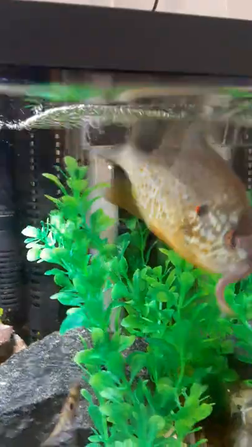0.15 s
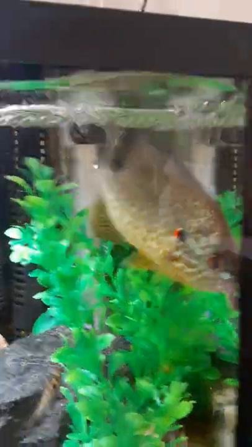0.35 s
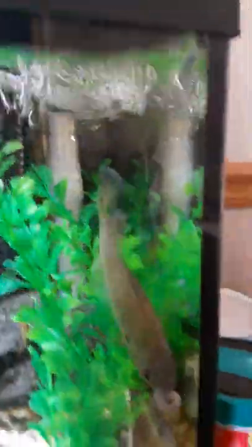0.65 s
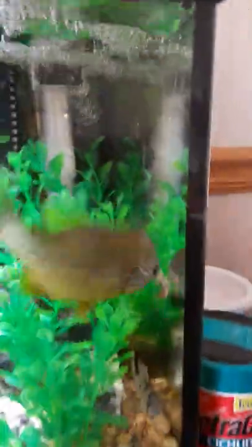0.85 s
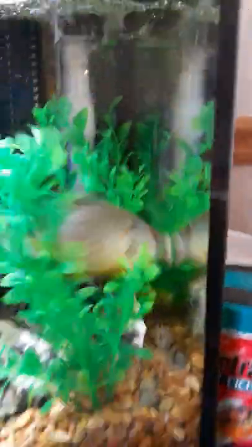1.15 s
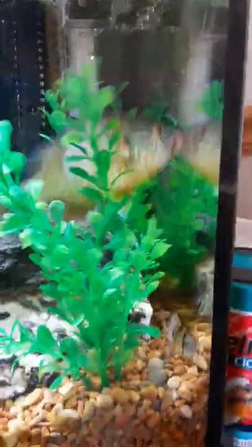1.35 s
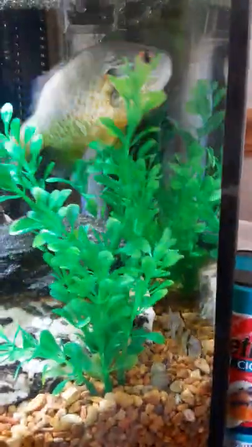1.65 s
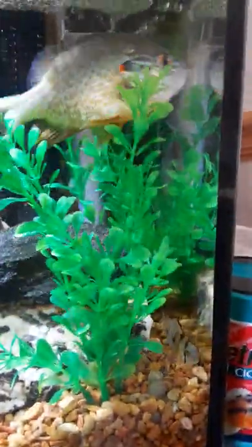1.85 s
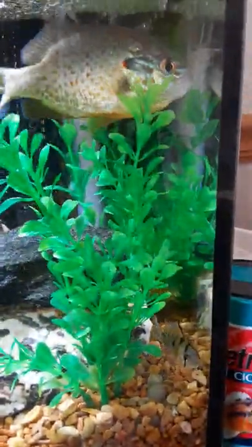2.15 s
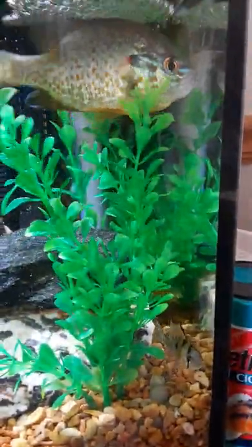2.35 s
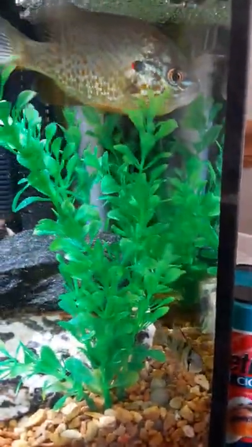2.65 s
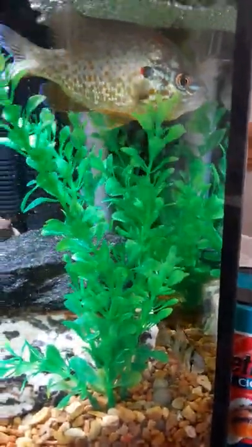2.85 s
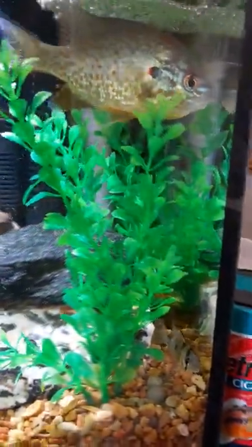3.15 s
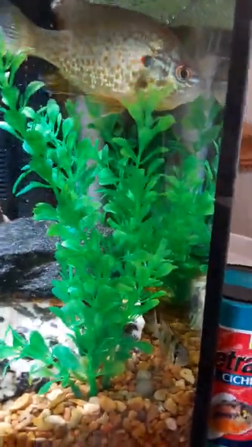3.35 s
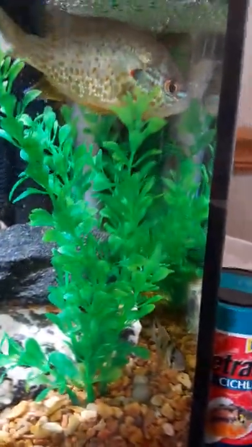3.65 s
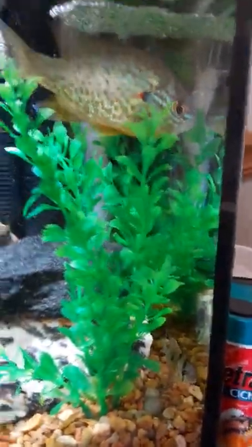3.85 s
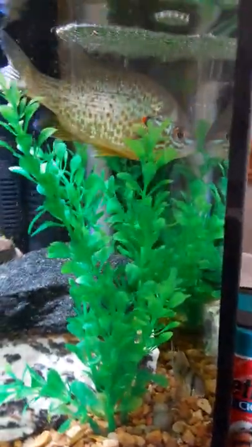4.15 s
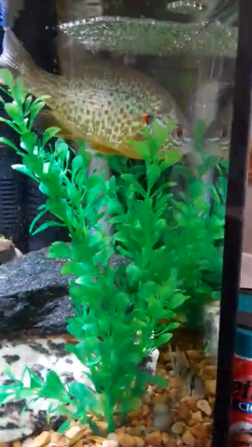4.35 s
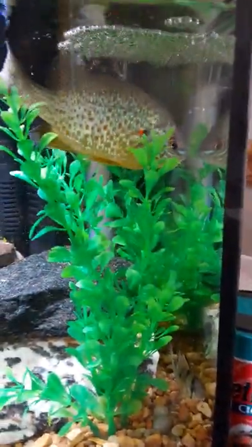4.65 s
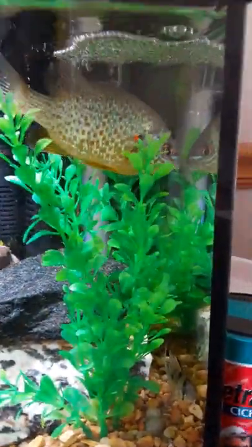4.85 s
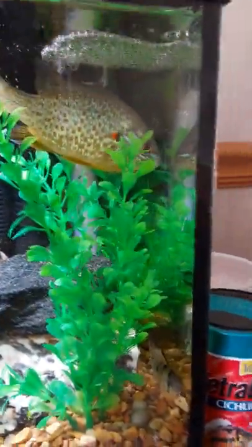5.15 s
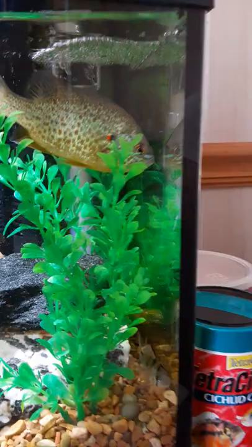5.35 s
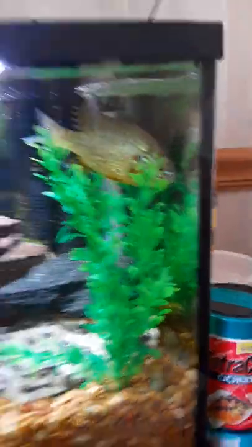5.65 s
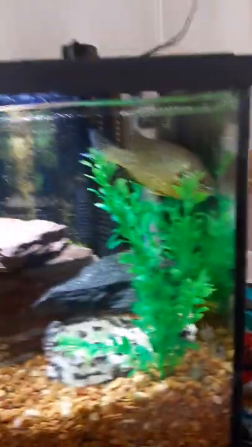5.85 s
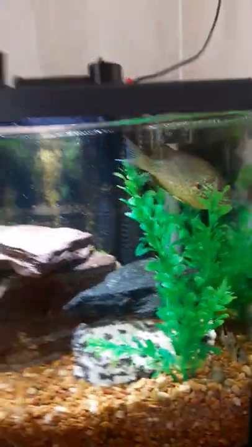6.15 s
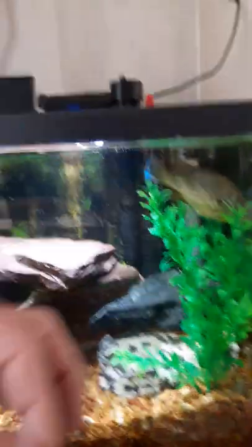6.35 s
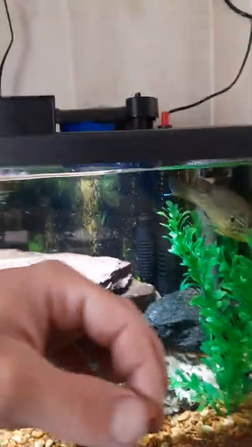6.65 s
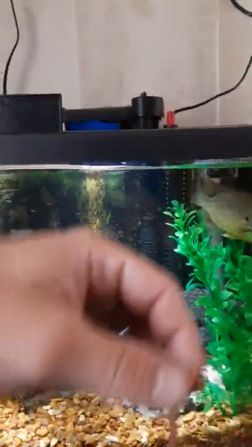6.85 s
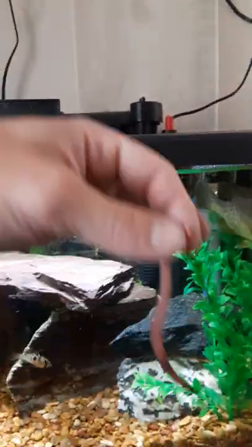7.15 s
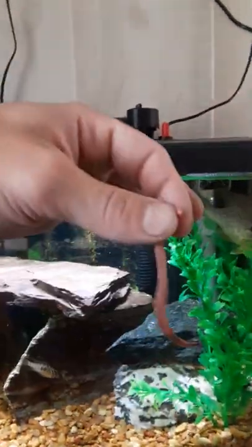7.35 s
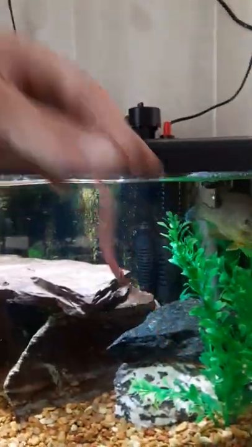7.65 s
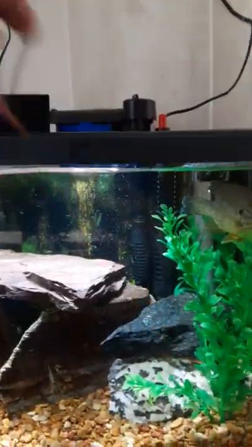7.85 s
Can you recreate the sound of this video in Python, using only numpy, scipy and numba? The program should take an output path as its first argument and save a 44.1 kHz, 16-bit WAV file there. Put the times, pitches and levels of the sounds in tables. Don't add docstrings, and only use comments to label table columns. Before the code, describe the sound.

A small aquarium pump hums steadily while wet bubbles glug, trickle and pop close by, with faint finger ticks and knocks in a quiet room.

```python
import sys
import numpy as np
from scipy import signal
from scipy.fft import rfft, irfft
from scipy.io import wavfile
from scipy.ndimage import uniform_filter1d
from numba import njit

SR = 44100
rng = np.random.default_rng(int(sys.argv[2]) if len(sys.argv) > 2 else 0)


def dump_mix(stems):
    frames = np.atleast_2d(stems).T
    limited = np.clip(frames, -1, 1)
    pcm = np.round(limited * 32767).astype(np.int16)
    wavfile.write(sys.argv[1], SR, pcm)


def gain_from_decibels(decibels):
    exponent = np.asarray(decibels, float) / 20
    return 10 ** exponent


N = 352800
T = np.arange(N) / SR
HZ = np.fft.rfftfreq(N, 1 / SR)

# [f/Hz, density level/dB]
AIR = [(15, -53), (25, -16), (69, -14), (122, -8), (221, -6.5), (289, -30), (598, -18), (782, -17),
       (1340, -21.5), (1900, -19.5), (3440, -27.5), (7500, -25), (9050, -34.5), (12200, -28.5),
       (15500, -30.5)]
# [f/Hz, likeness -1 to 1]
ALIKE = [(60, 0.75), (250, 1), (500, 0.37), (900, 0.0094), (2000, -0.32), (16000, 0.11)]
# [f/Hz, level/dB]
PORTS = [(100, 0), (400, 5.5), (1300, 1.5), (4000, 4.5), (7000, -1.5), (9300, 10.5), (12000, 1),
         (15000, -2)]
HUM_DB = [-58.5, -47, -62.5, -70, -61, -67.5, -67.5, -68.5, -70, -82, -74, -84, -66.5, -76]
# [f/Hz, rms level/dB]
FAN = (274.4, -61)
# [t/s, hum change level/dB, upper partials level/dB]
STANCE = [
    (0, -1, 5),
    (2, 0.5, 1),
    (4, 0, 3),
    (5.6, 0, 0),
    (6.2, -0.5, -0.5),
    (6.7, 0, -5.5),
    (8, 1.5, -11),
]
TURN_S = 6.13, 6.75
# [t/s, peak level near 190 Hz/dB, deep part level/dB]
THUMPS = [(0.518, -60, -60), (0.757, -41, -49), (0.866, -40.5, -66), (1.174, -36, -59), (1.2, -44, -57),
          (1.22, -47, -49), (1.247, -37, -55), (1.296, -51, -66), (1.337, -48, -60), (2.899, -43, -59),
          (2.969, -53, -65), (6.137, -43, -71)]
# [t/s, hiss level/dB]
RUB = [(0, -67.5), (.62, -64.5), (1.31, -66), (2.81, -66), (3.3, -61.5), (4.19, -59.5), (4.63, -64),
       (4.94, -60.5), (5.39, -63), (5.59, -57.5), (5.72, -66), (5.9, -67), (6.33, -58), (6.68, -68),
       (7.15, -61.5), (7.55, -73), (7.71, -61), (8, -56.5)]
# [t/s, length/s, level/dB]
RUSTLE = (5.42, .27, -64.5)
# [t/s, peak level/dB, duller part level/dB, left minus right level/dB]
TICKS = [(0.6574, -48, -11, -7.5), (1.5736, -41, -26, -1), (2.0368, -46, -19, -6.0),
         (2.8564, -50, -22, -8.0), (3.579, -44, -8.5, -20), (3.6494, -47, -13, -11),
         (3.9539, -45, -15, -12.0), (4.5286, -48, -13, -3), (5.3994, -53, -9, -2), (5.637, -33, -15, -19),
         (5.656, -16.5, -25.5, -39), (5.7488, -41, -20, -16), (5.7573, -39, -19, -17), (7.943, -43, -13, 1)]
# [t/s, steady glugging level/dB]
AIRFLOW = [(0, -43.5), (.09, -56), (.6, -51.5), (1.3, -54), (1.9, -54), (2.15, -56), (2.45, -52),
           (2.7, -55), (3.1, -52), (3.61, -50), (4.2, -54.5), (4.9, -53), (5.25, -53.5), (5.97, -54),
           (6.62, -52.5), (7.2, -50.5), (7.6, -52.5), (8, -50)]
# [t/s, length/s, level/dB]
SURGES = [(0.023, 0.068, -47.5), (0.39, 0.13, -47.5), (0.723, 0.055, -46.5), (0.89, 0.076, -51.5),
          (1.47, 0.04, -49.5), (1.64, 0.051, -52), (1.787, 0.053, -46.5), (2.327, 0.032, -51),
          (2.48, 0.039, -46), (2.866, 0.039, -54), (2.958, 0.034, -48.5), (3.3, 0.059, -47.5),
          (3.43, 0.031, -49), (3.647, 0.048, -48), (4.035, 0.052, -53), (4.51, 0.039, -49),
          (6.574, 0.045, -46.5), (6.71, 0.026, -47.5), (7.21, 0.038, -49), (7.385, 0.05, -48),
          (7.463, 0.027, -49), (7.546, 0.1, -47.5), (7.748, 0.023, -46)]
# [t/s, peak level/dB, f/Hz, ring time/s]
GLUGS = [(0.034, -41.5, 315, 0.043), (0.385, -40, 423, 0.069), (0.519, -33.5, 415, 0.059),
         (0.724, -22, 470, 0.029), (0.735, -31.5, 490, 0.057), (0.749, -48, 312, 0.037),
         (0.804, -39, 462, 0.081), (1.653, -39, 450, 0.083), (1.782, -41, 300, 0.05),
         (2.483, -43, 315, 0.06), (3.314, -37.5, 427, 0.068), (4.036, -36, 310, 0.057),
         (5.619, -33, 350, 0.037), (5.733, -40, 360, 0.059), (6.723, -40, 292, 0.026)]
# [f/Hz, width/Hz, level/dB]
SIDE_CHAMBER = [(282.4, 15, -2.5), (310, 26.5, -0.5), (348.8, 31, -1.5), (426.3, 31, 5), (458.4, 62, -4.5)]
# [f/Hz, width/Hz, level/dB]
FRONT_CHAMBER = [(275, 29, -2), (315, 62, -0.5), (357.4, 15.4, 5), (436, 55, -6), (477.6, 10, 3)]
# [f/Hz, width/Hz, level/dB]
SIDE_MODES = [(1003, 67, 0.5), (1202, 40, 9), (1500, 41, 0), (1610, 13, 8), (1880, 84, -5.5),
              (2050, 43, 7.5), (3070, 67, 3), (3730, 88, 10)]
# [f/Hz, width/Hz, level/dB]
FRONT_MODES = [(772, 15, 12.5), (1155, 32, 3), (1510, 50, 10.5), (1670, 37, 6), (1940, 47, 4.5),
               (2210, 120, 5.5), (3130, 80, 3), (3250, 86, -15), (3800, 150, 0)]
# [t/s, length/s, level/dB, smallest bubbles level/dB]
CLUSTERS = [(0.02, 0.027, -49.5, -56.5), (0.466, 0.04, -62, -54), (0.606, 0.034, -56, -56),
            (0.899, 0.052, -55, -57), (1.057, 0.11, -59, -71), (1.385, 0.098, -65, -63),
            (1.654, 0.026, -57.5, -62), (1.849, 0.045, -50.5, -69), (2.349, 0.014, -58, -64),
            (2.449, 0.18, -58.5, -66), (2.7711, 0.028, -60, -70), (2.983, 0.011, -51, -63),
            (3.02, 0.059, -60, -59), (3.435, 0.026, -58.5, -76), (3.666, 0.049, -54, -76),
            (3.791, 0.054, -56.5, -55.5), (3.94, .12, -57.5, -64), (4.1, 0.12, -60, -65),
            (4.512, 0.029, -51.5, -59), (4.6, 0.082, -58.5, -76), (4.8683, 0.046, -55.5, -65),
            (5.017, 0.2, -57, -61.5), (5.4999, 0.037, -48.5, -56.5), (5.7, 0.023, -62, -55.5),
            (5.843, 0.057, -55.5, -57), (5.9868, 0.1, -57, -63), (6.6125, 0.052, -53, -56),
            (7.084, 0.18, -59.5, -63), (7.463, 0.2, -60, -66), (7.807, 0.21, -63, -70)]
# [t/s, peak level/dB, f/Hz]
POPS = [(0.187, -42, 1940), (0.521, -40, 2000), (0.6362, -38, 1990), (0.8026, -43, 1980),
        (1.0026, -45.5, 2070), (1.069, -46, 2050), (1.5663, -44.5, 1610), (2.0837, -45, 1950),
        (2.2523, -46, 1620), (3.0357, -37, 2090), (3.378, -42, 1600), (3.533, -44.5, 1670),
        (3.671, -45, 1630), (4.137, -45, 2060), (4.2023, -45, 2070), (5.1342, -44, 1930),
        (5.1523, -39, 2000), (5.8854, -42, 2400), (5.9858, -45, 1760), (6.2524, -41.5, 1940),
        (6.884, -42, 1940), (6.9518, -41.5, 1970), (7.1177, -42.5, 2260), (7.255, -40, 1510),
        (7.467, -39.5, 1520), (7.4994, -43, 1880), (7.5698, -45, 1960), (7.608, -43, 1510),
        (7.837, -44.5, 1500), (7.885, -45, 1930)]
# [t/s, peak level/dB, f/Hz]
MORE_POPS = [(0.17, -45, 1980), (0.4534, -45.5, 2060), (0.9207, -47, 1610), (0.9524, -50, 2080),
             (1.0879, -47, 2080), (1.1548, -46.5, 1880), (1.1694, -52, 2190), (1.404, -47, 2020),
             (1.4376, -52, 1870), (1.4661, -49, 2060), (1.6664, -44, 1660), (1.7828, -45.5, 2050),
             (1.8684, -46, 1620), (1.8881, -49, 1970), (1.9044, -51, 1610), (2.0363, -51, 1870),
             (2.1415, -53, 1610), (2.3516, -46, 2070), (2.7994, -54, 1980), (2.8988, -46.5, 1620),
             (3.0494, -45, 2000), (3.0694, -44, 1610), (3.1857, -50, 1610), (3.2994, -50, 2040),
             (3.5667, -47, 1840), (3.8003, -44, 1960), (4.5294, -46, 2070), (4.6364, -50, 2050),
             (4.8844, -48, 2070), (5.12, -50, 1910), (5.854, -41, 1880), (6.0194, -50, 1920),
             (6.5839, -48, 1500), (6.6323, -43, 1950), (6.659, -50, 1970), (6.6877, -50, 1490),
             (6.7151, -46, 1850), (6.8009, -48, 1960), (6.8344, -53, 1920), (6.8676, -45, 1960),
             (7.1671, -46, 1510), (7.2225, -48, 1500), (7.3193, -52, 1900), (7.437, -45.5, 1960),
             (7.5486, -48, 1980), (7.7707, -49, 1700)]
# [t/s, peak level/dB, f/Hz]
PINGS = [(0.038, -35.5, 3170), (0.4858, -43, 4230), (0.6208, -41, 3850), (0.636, -39.5, 4570),
         (0.8869, -44, 3520), (0.9517, -51, 2930), (1.3877, -43, 3550), (3.0345, -50, 3270),
         (3.8385, -36, 3730), (4.14, -39, 3340), (4.517, -38.5, 3730), (5.204, -40.5, 3600),
         (5.5024, -37.5, 3570), (5.656, -55, 4960), (5.885, -35.5, 3110), (6.551, -47, 3770),
         (6.588, -39, 3320), (6.635, -35.5, 3760), (6.652, -37, 3800), (6.7182, -43.5, 3800),
         (6.8169, -48, 3830), (6.867, -45, 3720), (6.8857, -41.5, 3800), (7.119, -49, 3740),
         (7.2185, -44, 4030), (7.2538, -39.5, 3650), (7.532, -45, 3900), (7.57, -37, 3480),
         (7.9229, -47, 5100), (7.944, -47, 2950),
         (0.5681, -51, 3980), (0.9094, -44, 3130), (1.4715, -48, 3150), (1.567, -46, 2980),
               (1.6696, -46, 3630), (1.8487, -51, 3040), (1.8881, -47, 2870), (1.9194, -49, 5080),
               (2.2358, -53, 4030), (2.3381, -49, 2860), (2.354, -47, 2900), (2.5167, -52, 2670),
               (3.0764, -46, 3730), (3.8077, -49, 2900), (3.9534, -48, 2640), (4.0188, -48, 2600),
               (4.0821, -48, 2880), (4.8693, -48, 3760), (4.8894, -47, 3760), (5.0177, -50, 4050),
               (5.1512, -50, 2680), (5.7004, -49, 2880), (5.7129, -47, 3830), (5.9044, -41, 3880),
               (6.0691, -43, 3720), (6.2512, -47, 3760), (6.8, -50, 3720), (7.1003, -54, 3780),
               (7.1676, -54, 3740), (7.3851, -54, 3770), (7.4689, -49, 3040), (7.4999, -52, 3840),
               (7.7677, -49, 3710), (7.8835, -49, 2980), (7.965, -46.5, 3940)]
# [t/s, peak level/dB]
SPLATS = [
    (3.034, -47),
    (3.318, -50),
    (3.379, -45),
    (5.72, -50),
    (7.9404, -34.5),
]

AIR_DB = -55
MAINS_HZ = 60.02
LOW_HZ, TOP_HZ = 48, 15790
SHARP_DB, SHARP_TOP_HZ = -38, 17300
SCUFF_S, SCUFF_DB, SCUFF_TOP_DB = 0.013, -18, -61
DULL_DB, DULL_SLOPE = -66, 2.2
RUSTLE_HZ, RUSTLE_WIDTH_HZ = 7050, 750
SURGE_RISE_DB_PER_S, SURGE_FALL_DB_PER_S = 400, 193
RISE_DB_PER_S, FALL_DB_PER_S = 1500, 300
STROKE_DB, STROKE_S = 0.5, 0.0034
TRICKLE_DB, MIST_DB = -13.5, -16.5
SPRAY_S, SPRAY_DB, SPRAY_SMALL_DB = 0.009, -14, -23.5
LATE_SHARE = 0.56
LEAD_DB, LEAD_HZ = 12.5, 1980
CRACK_DB = -9.5
CRACKLE_DB = -12
TUBE_LAG = 21


def on_log(table, hz=HZ):
    f, v = np.transpose(table)
    return np.interp(np.log(hz + 1), np.log(f), v)


def columns(table, s=T):
    t, *rest = np.transpose(table)
    return [np.interp(s, t, c) for c in rest]


def unit(x):
    return x / np.sqrt(np.mean(x ** 2))


def filt(x, gain):
    return irfft(rfft(x) * gain, N)


def band(hz, width):
    return 1 / (1 + 1j * (HZ ** 2 - hz ** 2) / (HZ * width + 1e-9))


def body(modes):
    return sum((-1) ** k * gain_from_decibels(db) * band(f, w) for k, (f, w, db) in enumerate(modes))


def walk(rate):
    hold = int(SR / rate)
    steps = np.repeat(rng.standard_normal(N // hold + 1), hold)
    return 1.89 * uniform_filter1d(uniform_filter1d(steps, hold), hold)[:N]


def swells(s, length, db, under_db, rise_db, fall_db):
    t = T[::64, None]
    each_db = db - rise_db * np.maximum(s - t, 0) - fall_db * np.maximum(t - s - length, 0)
    events = np.sqrt(np.sum(gain_from_decibels(2 * each_db), 1))
    return 20 * np.log10(np.hypot(np.interp(T, t[:, 0], events), gain_from_decibels(under_db)))


@njit
def ring(n, start, step, fade, glide, size, onset):
    y = np.zeros(n)
    for k in range(len(start)):
        a, w, ph, i, shut = size[k], step[k], 0., start[k], 1.
        while a > .004 * size[k] and i < n:
            y[i] += a * (1 - shut) * np.sin(ph)
            ph += w
            w *= glide[k]
            a *= fade[k]
            i += 1
            shut *= onset[k]
    return y


def bubbles(s, hz, t60, db, rise=0.39, swell=0.26):
    n = np.maximum(t60 * SR + 0 * s, 8)
    step = hz / SR + 0 * s
    start = (s * SR).astype(np.int64)
    fade, glide = 1000 ** (-1 / n), (1 + rise) ** (1 / n)
    return ring(N, start, 2 * np.pi * step, fade, glide, gain_from_decibels(db), np.exp(-step / swell))


def air():
    alike = np.clip(on_log(ALIKE), -.99, .99)
    noise = rfft(rng.standard_normal((2, N)))
    mid, side = noise * gain_from_decibels(on_log(AIR)) * np.sqrt([1 + alike, 1 - alike])
    pair = np.array([mid + side, mid - side]) * gain_from_decibels(np.outer([.5, -.5], on_log(PORTS)))
    out, half_octave = 0, 2 * np.log2(HZ / 30 + 1e-9)
    for k in range(0, 20, 2):
        share = np.cos(np.pi / 4 * np.clip(half_octave - k, -2, 2)) ** 2
        out = out + irfft(pair * share, N) * gain_from_decibels(1.2 * walk(8) + .2 * walk(1.2))
    return unit(out) * gain_from_decibels(AIR_DB)


def pump():
    all_db, upper_db = columns(STANCE)
    left_right = np.array([[.5], [-.5]])
    partials = [(MAINS_HZ * (k + 1), db) for k, db in enumerate(HUM_DB)] + [FAN]
    out = 0
    for hz, db in partials:
        phase = 2 * np.pi * (hz * T + rng.random()) + left_right * (0.45 + 0.8 * (hz / 800) ** 3)
        tilt = on_log(PORTS, hz) * left_right
        waver = hz / 800 * (upper_db + 2.33 * walk(14)) + 0.39 * walk(9)
        out = out + gain_from_decibels(db + tilt + all_db + waver) * np.sqrt(2) * np.sin(phase)
    return out


def ticks(rows):
    s, db, dull_db, pan_db = np.transpose(rows)
    x = bubbles(s + 0.0014, 13800, 0.0006, db + 22.5, rise=0, swell=1.4)
    x += bubbles(s + 0.00085, 7000, 0.00074, db + dull_db + 26.5, rise=0, swell=0.16)
    return x * np.array([gain_from_decibels(np.interp(T, s + .002, pan_db)), np.ones(N)])


def hand():
    s, db, deep_db = np.transpose(THUMPS)
    knocks = bubbles(s, 207, 0.084, db, rise=-0.25, swell=0.24)
    knocks += bubbles(s, 138, 0.12, db - 0.5, rise=-0.092)
    knocks += bubbles(s, 87.7, 0.27, deep_db, rise=0, swell=0.22)

    rub_db = columns(RUB)[0]
    dull_db = DULL_DB + DULL_SLOPE * (rub_db + 61.5)
    s, db = np.transpose([row[:2] for row in TICKS if row[1] < SHARP_DB])
    scuff_db = np.minimum(db + SCUFF_DB, SCUFF_TOP_DB)
    bright_db = swells(s, SCUFF_S, scuff_db, rub_db, 900, 400)
    rustle_db = swells(*RUSTLE, -120, 200, 200) + 3.9 * walk(40)
    grip_db = .9 * walk(12)

    noise = rng.standard_normal((2, 2, N))
    bright = unit(filt(noise[0], band(13500, 6800) ** 2))
    bright *= gain_from_decibels(bright_db + grip_db + np.array([[-9], [4]]))
    dull = unit(filt(noise[1], band(6640, 4100) ** 2))
    dull *= gain_from_decibels(dull_db + 2.3 * grip_db + np.array([[-6], [1]]))
    rustle = unit(filt(noise[1, ::-1], band(RUSTLE_HZ, RUSTLE_WIDTH_HZ) ** 2))
    rustle *= gain_from_decibels(rustle_db + np.array([[-7], [0]]))
    return knocks + bright + dull + rustle


def patter(count, lo_hz, hi_hz, cycles, scatter_db):
    when, pitch, size = rng.random((count, 3)).T
    hz = lo_hz * (hi_hz / lo_hz) ** pitch
    x = bubbles(when * T[-1], hz, cycles / hz, -scatter_db * np.log(1 - size))
    return x / np.sqrt(uniform_filter1d(x ** 2, SR // 8))


def swarm(count, lo_hz, hi_hz, cycles, scatter_db, level_db, apart_db=-4):
    both, left, right = [patter(count, lo_hz, hi_hz, cycles, scatter_db) for _ in range(3)]
    return (both + gain_from_decibels(apart_db) * np.array([left, right])) * gain_from_decibels(level_db)


def turning(x, side_modes, front_modes):
    front = np.interp(T, TURN_S, [0, 1])
    return (1 - front) * filt(x, body(side_modes)) + front * filt(x, body(front_modes))


def ports(x, lag, wet_db, tail_s):
    t = T[:SR // 3]
    tails = rng.standard_normal((2, len(t))) * 1000 ** (-t / tail_s) * (t > .002)
    tails *= gain_from_decibels(wet_db) / np.sqrt(np.sum(tails ** 2, axis=1, keepdims=True))
    tails[0, 0], tails[1, lag] = 1, 1
    heard = signal.fftconvolve(x, tails, axes=1)[:, :N]
    return filt(heard, gain_from_decibels(np.outer([.5, -.5], on_log(PORTS))))


def glugging():
    steady_db = columns(AIRFLOW)[0] + 1.73 * walk(20)
    level_db = swells(*np.transpose(SURGES), steady_db, SURGE_RISE_DB_PER_S, SURGE_FALL_DB_PER_S)
    x = swarm(count=1400, lo_hz=244.0, hi_hz=492, cycles=7.3, scatter_db=2.0, level_db=level_db - 6.0)
    hood = turning(x, SIDE_CHAMBER, FRONT_CHAMBER)
    s, db, hz, t60 = np.transpose(GLUGS)
    glugs = bubbles(s, hz, t60, db, rise=-0.11, swell=0.37)
    return gain_from_decibels(-3.0) * x + gain_from_decibels(4.5) * hood + glugs


def foam():
    s, length, db, small_db = np.transpose(CLUSTERS)
    lone_s, lone_db, _ = np.transpose(POPS + MORE_POPS)
    flow_db = columns(AIRFLOW)[0]
    stroke_db = STROKE_DB * np.cos(2 * np.pi * MAINS_HZ * (T - STROKE_S))

    trickle_db = flow_db + TRICKLE_DB + 0.91 * walk(14)
    main_db = swells(s, length, db, trickle_db, RISE_DB_PER_S, FALL_DB_PER_S)
    main_db = swells(lone_s, SPRAY_S, lone_db + SPRAY_DB, main_db, RISE_DB_PER_S, FALL_DB_PER_S)
    main_db = main_db + stroke_db

    mist_db = flow_db + MIST_DB + 1.6 * walk(15)
    fizz_db = swells(s + LATE_SHARE * length, (1 - LATE_SHARE) * length, small_db, mist_db, 340, 340)
    fizz_db = swells(lone_s, SPRAY_S, lone_db + SPRAY_SMALL_DB, fizz_db, RISE_DB_PER_S, FALL_DB_PER_S)
    fizz_db = fizz_db + 0.46 * stroke_db

    low_db = 0.43 * main_db - 41.5
    crackle_db = main_db + stroke_db + CRACKLE_DB
    x = swarm(count=1500, lo_hz=1430, hi_hz=2550, cycles=7.9, scatter_db=2.5, level_db=main_db - 8.0)
    x += swarm(count=2400, lo_hz=2480, hi_hz=5550, cycles=6.6, scatter_db=3.0, level_db=fizz_db - 4.0)
    x += swarm(count=1600, lo_hz=810, hi_hz=1400, cycles=7.4, scatter_db=3.5, level_db=low_db)
    x += swarm(count=1200, lo_hz=1720, hi_hz=5200, cycles=2.7, scatter_db=3.5, level_db=crackle_db)
    return x


def single_bursts():
    s, _, db, _ = np.transpose(CLUSTERS)
    lone_s, lone_db, lone_hz = np.transpose(POPS + MORE_POPS)
    lead_hz = LEAD_HZ * (1 + 0.028 * rng.standard_normal(len(s)))
    pops = bubbles(s, lead_hz, 0.023, db + LEAD_DB, rise=0.045, swell=0.59)
    pops += bubbles(lone_s, lone_hz, .014, lone_db + 3, rise=.06, swell=.6)

    all_s = np.r_[s, lone_s]
    all_hz = np.r_[LEAD_HZ + 0 * s, lone_hz]
    all_db = np.r_[db + LEAD_DB, lone_db]
    for ratio in (.7, 1.3, 1.8):
        pops += bubbles(all_s, ratio * all_hz, 0.0041, all_db + CRACK_DB, swell=0.088)

    s, db, hz = np.transpose(PINGS)
    pops += bubbles(s, hz, 0.01, db + 2.5, rise=0.037, swell=0.51)

    s, db = np.transpose(SPLATS)
    for hz, rel_db in [(800, -13), (1600, 9), (2500, 10.5), (3600, 2), (5000, -13)]:
        pops += bubbles(s + 0.0022, hz, 5 / hz, db + rel_db, swell=0.081)
    return pops


def bursting():
    x, pops = foam(), single_bursts()
    tube = turning(x + gain_from_decibels(-12.0) * pops, SIDE_MODES, FRONT_MODES)
    return gain_from_decibels(2.5) * x + pops + gain_from_decibels(2.0) * tube


def scene():
    water = ports(bursting(), lag=TUBE_LAG, wet_db=-4.5, tail_s=0.05)
    water += ports(glugging(), lag=2, wet_db=-7, tail_s=0.09)
    faint = ticks([row for row in TICKS if row[1] < SHARP_DB])
    sharp = ticks([row for row in TICKS if row[1] >= SHARP_DB])
    steady = filt(air() + pump() + hand() + faint + water, HZ < TOP_HZ)
    return steady + filt(sharp, np.clip((SHARP_TOP_HZ - HZ) / 1500, 0, 1) ** 2)


def top_cut(x):
    return signal.sosfilt(signal.butter(12, 17090, fs=SR, output="sos"), x)


def record(dry):
    bass_cut = 1 / np.sqrt(1 + (LOW_HZ / (HZ + 1)) ** 6)
    port_dip = 1 - 0.59 * band(9260, 2050)
    return top_cut(filt(dry, bass_cut * port_dip))


dry = scene()
out = record(dry)
dump_mix(out)
```